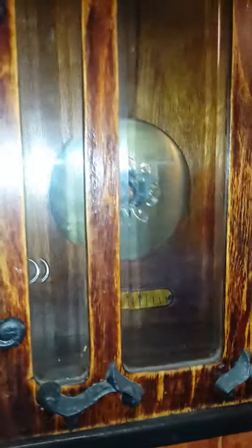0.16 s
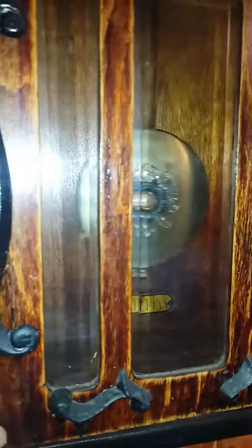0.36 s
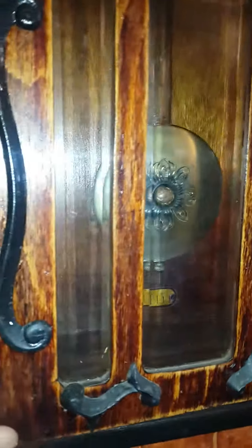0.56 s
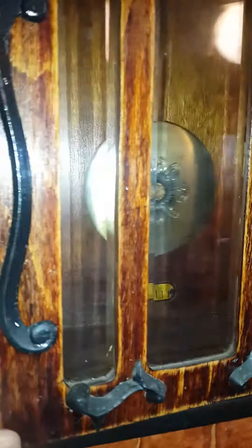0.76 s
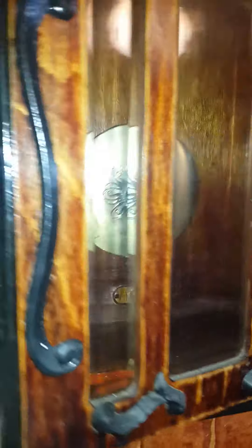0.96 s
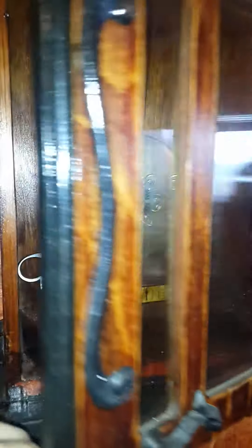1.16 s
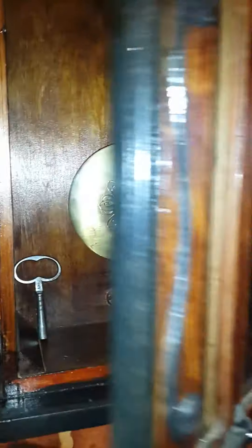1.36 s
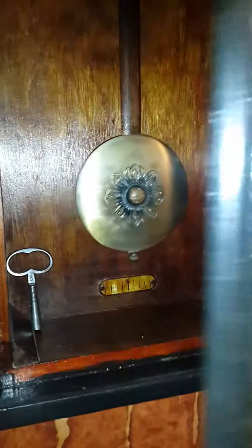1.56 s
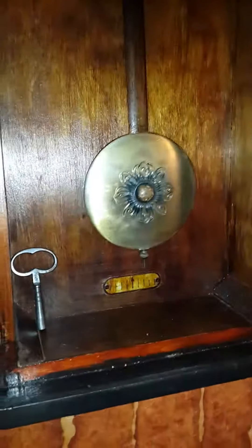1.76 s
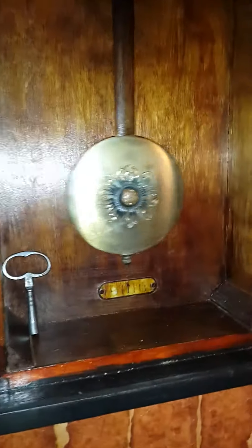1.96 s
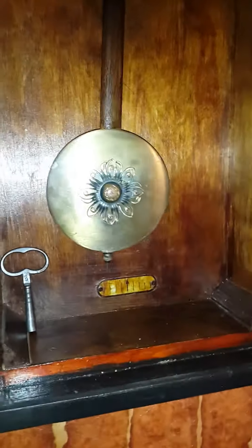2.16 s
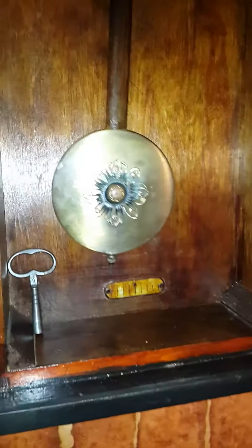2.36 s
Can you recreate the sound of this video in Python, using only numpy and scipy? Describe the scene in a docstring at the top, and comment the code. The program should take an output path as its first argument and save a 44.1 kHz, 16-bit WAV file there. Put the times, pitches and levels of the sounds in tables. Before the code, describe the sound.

A sticking wooden clock door scrapes, clicks and knocks loose at the start, ringing its hollow case; then faint hinge rubs and a soft bump, with steady metallic ticks, close stereo microphones in a quiet hissy room.

```python
"""A pendulum wall clock ticks in a quiet room; its glazed wooden door is pulled open between the beats.
The two pallets strike in turn: damped modes, a steel ping, dense clatter and a bright noise snap.
The door scrapes (shaped noise), jumps free with a knock that rings the case (modes), clicks and bumps.
Its hinge chafes as it swings. Room noise, a sinking hiss, a thin whine and faint hums lie underneath."""
import sys
import numpy as np
from scipy import signal
from scipy.fft import rfft, irfft, next_fast_len
from scipy.io import wavfile
from scipy.ndimage import map_coordinates

SR = 44100
rng = np.random.default_rng(int(sys.argv[2]) if len(sys.argv) > 2 else 0)


def wav_record(signal):
    """Record a signal, one row per channel, as 16-bit PCM in the file named by sys.argv[1]."""
    frames = np.transpose(np.atleast_2d(signal))
    bounded = np.clip(frames, -1, 1)
    # unit amplitude maps onto the largest positive 16-bit level
    quanta = np.round(bounded * 32767).astype(np.int16)
    wavfile.write(sys.argv[1], SR, quanta)


N = 105840
AGE_S = np.arange(SR) / SR  # time since a contact

# escapement beats: t/s, ring level/dB, steel ping level/dB, clatter level/dB, snap level/dB, pallet 0 or 1
BEATS = [(-.008, -53.5, -52.5, -51.5, -68, 1), (.553, -51.5, -49, -48.5, -52, 0),
         (1.141, -54, -52.5, -47, -55.5, 1), (1.698, -47, -53.5, -45, -42, 0),
         (2.290, -49.5, -49.5, -47.5, -47, 1)]
# movement modes, pallet 0: f/Hz, level/dB, t60/s
TICK_MODES = [(535.2, 1.5, 0.25), (965, -7, 0.13), (2125, -8, 0.18), (2215, 1, 0.22), (2600, 1.5, 0.14),
              (4880, -5, 0.11), (6560, -4, 0.13)]
# movement modes, pallet 1: f/Hz, level/dB, t60/s
TOCK_MODES = [(585, 0.5, 0.22), (828, -4, 0.087), (2137, -1.5, 0.27), (2210, -6.5, 0.13),
              (2602, 10.5, 0.062), (5110, 5, 0.073), (6020, 14, 0.041)]
# steel ping modes: f/Hz, level/dB, t60/s
PING_MODES = [(6340, 2.6, 0.26), (6420, 1.4, 0.14)]
# dense ring of wheels and plates: f/Hz, relative density/(dB per Hz)
CLATTER_SPECTRUM = [(150, -15), (300, -1.5), (430, -5.5), (580, 2), (720, -5.5), (1250, -8.5), (2150, 1.5),
                    (2750, -3.5), (3350, -12), (4900, -6.5), (5400, -3.5), (6500, -2.5), (8000, -21.5),
                    (15000, -21)]
# its decay: f/Hz, t60/s
CLATTER_T60 = [(300, 0.37), (2000, 0.26), (6000, 0.29), (12000, 0.39)]
# first metal contact, pallet 0: f/Hz, relative density/(dB per Hz)
TICK_SNAP = [(600, -18), (2500, -5), (3400, -22), (4850, 13.5), (5450, -2), (6600, 10), (7250, 6),
             (8200, -16), (10800, -1.5), (15500, -8)]
# first metal contact, pallet 1: f/Hz, relative density/(dB per Hz)
TOCK_SNAP = [(600, -20), (2700, 2.5), (4300, -2), (5250, 8), (7000, -3), (8500, -25), (9400, 4),
             (11000, -11), (15500, -13)]
# a tooth rubs over the pallet: t/s, length/s, level/dB
SLIDES = [(0.605, 0.013, -50), (1.062, 0.0072, -57), (1.741, 0.019, -49.5), (2.216, 0.006, -58)]
# tooth rub: f/Hz, relative density/(dB per Hz)
SLIDE_SPECTRUM = [(300, -7.5), (850, -8), (1220, 3), (1500, -3.5), (1900, 3.5), (3600, -10), (6000, -4.5),
                  (15000, -27.5)]
SNAP_T60_S, SNAP_LEFT_MINUS_RIGHT_DB, BEAT_ATTACK_S = 0.069, 5, 0.0047

# door knocks and bumps: t/s, case level/dB, door level/dB, thud level/dB, thud centre f/Hz, thud t60/s
KNOCKS = [ (.217, -32, -66, -35.5, 243, 0.26), (.255, -48.5, -49, -39.5, 435, 0.33),
          (.324, -48, -73, -48, 191, 0.32), (.503, -78, -72, -50, 195, .06),
          (.895, -71, -70, -56.5, 510, 0.29), (1.146, -92, -59.5, -86, 300, 0.099),
          (1.386, -63, -47.5, -50.5, 180, 0.42)]
# wooden case modes: f/Hz, level/dB, t60/s
CASE_MODES = [(92.8, -12.5, 0.48), (146.2, 0.5, 0.31), (175.4, -1, 0.37), (204.2, 2.5, 0.41),
              (324.7, -4.5, 0.39), (391.6, -7.5, 0.28), (470.6, -12, 0.33), (499.5, -14, 0.43),
              (606, -10, 0.21), (644, -12.5, 0.13), (717, -13, 0.21), (831, -8, 0.16), (933, -10, 0.1)]
# glazed door modes: f/Hz, level/dB, t60/s
PANEL_MODES = [(239.3, -15, 0.75), (288.7, 5.5, 0.28), (540, -7, 0.35)]
THUD_FALL_DB_PER_OCT, KNOCK_ATTACK_S = 14, 0.00066
PUSH_DB, PUSH_T60_S = 2.5, 0.034  # first swing of the wood, relative to the thud

# door edge and catch rub: t/s, length/s, level/dB
SCRAPES = [(0.176, 0.048, -48.5), (0.216, 0.048, -45), (0.256, 0.029, -43.5), (0.371, 0.0087, -56.5)]
# scrape: f/Hz, relative density/(dB per Hz)
SCRAPE_SPECTRUM = [(150, -1), (600, -13), (1200, -5), (2500, 2), (3600, -2), (5800, 4), (7500, -3),
                   (10000, -8), (15000, -14)]
# scrape decay: f/Hz, t60/s
SCRAPE_T60 = [(500, 0.65), (2000, 0.28), (6000, 0.35), (12000, 0.32)]

# the catch slips: t/s, click level/dB, click centre f/Hz, ring level/dB
CLICKS = [(0.1757, -37, 5000, -60), (0.2177, -30, 10500, -56), (.227, -42, 5400, -58),
          (0.255, -31, 4900, -49), (0.2597, -35, 5800, -47), (.3245, -44, 5900, -60)]
# metal catch modes: f/Hz, level/dB, t60/s
CATCH_MODES = [(2064, 0, 0.17), (2474, 1.5, 0.26), (3220, -6, 0.25), (5440, 6, 0.12), (5860, 1, 0.16)]
CLICK_T60_S, CLICK_LEFT_MINUS_RIGHT_DB, CLICK_FALL_DB_PER_OCT = 0.007, 0, 14

# the hinge chafes: t/s, length/s, level/dB
CHAFES = [(0.793, 0.087, -57), (1.401, 0.0086, -54.5), (1.562, 0.0095, -55)]
# chafe: f/Hz, relative density/(dB per Hz)
CHAFE_SPECTRUM = [(400, -15.5), (2400, -8.5), (4000, -8.5), (4450, -8), (5050, -3.5), (6500, 3.5),
                  (8700, -10), (15000, -18)]
# chafe decay: f/Hz, t60/s
CHAFE_T60 = [(500, 0.62), (10000, 0.14)]
# hinge mode: f/Hz, level/dB, t60/s
HINGE_MODES = [(4480, -1, 0.11)]
CHAFE_RISE = 0.74  # swell time constant / chafe length

# room noise: f/Hz, relative density/(dB per Hz)
ROOM_SPECTRUM = [(30, -59), (48, 18), (70, -41), (105, -6.5), (170, -11), (270, -16), (450, -20),
                 (4500, -31.5), (15000, -26.5)]
# hiss level: t/s, level/dB
HISS_LEVEL = [(0, -60), (.6, -62.5), (1.05, -64), (1.33, -65), (1.5, -63), (1.9, -66.5), (2.4, -73.5)]
# hiss: f/Hz, relative density/(dB per Hz)
HISS_SPECTRUM = [(100, 4.5), (195, 14.5), (280, 9.5), (450, 10.5), (1000, -3), (2200, 3), (3600, -0.5),
                 (6000, 3), (8500, -6), (15000, -9)]
# thin whine, narrow-band noise: f/Hz, relative density/(dB per Hz)
WHINE_SPECTRUM = [(5400, -32), (5720, -4), (5800, -4), (5950, -17), (6400, -65)]
# wavering tones: f/Hz, level/dB
HUM_TONES = [(97.5, -72.5), (129, -75.5), (148, -75.5), (195, -71.5), (5735, -81), (5783, -81.5)]
# lowest hum: t/s, level/dB
LOW_HUM_LEVEL = [(0, -73), (.7, -61.5), (1.2, -83), (1.6, -61), (1.95, -63), (2.4, -60)]
ROOM_DB, WHINE_DB, LOW_HUM_HZ = -66, -82.5, 51.8

# left-right likeness: f/Hz, correlation/1
ALIKE = [(100, 1), (300, 0.83), (650, 0.43), (1500, 0), (15000, 0)]
# microphone balance: f/Hz, left minus right/dB
BALANCE = [(100, 3), (300, 0.5), (600, 2), (1800, -3.5), (3200, 0.5), (6000, 1), (11000, 3)]
LOW_CUT_HZ, TOP_HZ = 57.3, 15600
# narrow resonances in noise: depths, knot spacing, frequency at which the depth is halved
BURST_RIPPLE_DB, HISS_RIPPLE_DB, RIPPLE_HZ, RIPPLE_TOP_HZ = 5, 4, 39.73, 5150


def escapement():
    """Teeth snap onto alternate pallets and ring the movement; between beats a tooth rubs over a pallet."""
    out = np.zeros((2, N))
    for s, ring_db, ping_db, clatter_db, snap_db, pallet in BEATS:
        modes, snap = (TOCK_MODES, TOCK_SNAP) if round(pallet) else (TICK_MODES, TICK_SNAP)
        add(out, s, amp(ring_db) * ring(modes, BEAT_ATTACK_S, blur=0.28, blur_rate=153))
        add(out, s, amp(ping_db) * ring(PING_MODES, BEAT_ATTACK_S, blur=0.43, blur_rate=83))
        add(out, s, amp(clatter_db) * burst(CLATTER_SPECTRUM, CLATTER_T60, BEAT_ATTACK_S))
        add(out, s, amp(snap_db) * crack(snap, SNAP_T60_S, SNAP_LEFT_MINUS_RIGHT_DB))
    for s, length_s, db in SLIDES:
        add(out, s, amp(db) * burst(SLIDE_SPECTRUM, CLATTER_T60, attack_s=0.014, hold_s=length_s))
    return out


def door_knocks():
    """Each knock pushes the wood (damped sine under a noise thud) and rings case and door."""
    out = np.zeros((2, N))
    for s, case_db, panel_db, thud_db, centre_hz, t60_s in KNOCKS:
        rise = 1 - np.exp(-AGE_S / KNOCK_ATTACK_S)
        thud = noise(hump(centre_hz, THUD_FALL_DB_PER_OCT), SR) * amp(-60 * AGE_S / t60_s) * rise
        push = amp(PUSH_DB - 60 * AGE_S / PUSH_T60_S) * np.sin(2 * np.pi * centre_hz * AGE_S)
        add(out, s, amp(thud_db) * (thud - push))
        add(out, s, amp(case_db) * ring(CASE_MODES, attack_s=0.002, blur=0.3, blur_rate=25))
        add(out, s, amp(panel_db) * ring(PANEL_MODES, attack_s=0.018, blur=0.27, blur_rate=69))
    return out


def door_scrapes():
    """The sticking edge rubs with uneven grip, exciting many close modes."""
    out = np.zeros((2, N))
    for s, length_s, db in SCRAPES:
        grip = amp(2.4 * wobble(400, SR))
        rub = burst(SCRAPE_SPECTRUM, SCRAPE_T60, attack_s=0.0029, hold_s=length_s)
        add(out, s, amp(db) * grip * rub)
    return out


def catch_clicks():
    """The slipping catch gives a short noise click and rings in its metal modes."""
    out = np.zeros((2, N))
    for s, click_db, centre_hz, ring_db in CLICKS:
        spectrum = hump(centre_hz, CLICK_FALL_DB_PER_OCT)
        add(out, s, amp(click_db) * crack(spectrum, CLICK_T60_S, CLICK_LEFT_MINUS_RIGHT_DB))
        add(out, s, amp(ring_db) * ring(CATCH_MODES, attack_s=0.0045, blur=0.64, blur_rate=179))
    return out


def hinge_chafes():
    """Friction in the hinge swells as shaped noise and sounds one blurred mode."""
    out = np.zeros((2, N))
    for s, length_s, db in CHAFES:
        rise_s = CHAFE_RISE * length_s
        add(out, s, amp(db) * burst(CHAFE_SPECTRUM, CHAFE_T60, attack_s=rise_s, hold_s=length_s))
        add(out, s, amp(db) * ring(HINGE_MODES, attack_s=rise_s, blur=0.47, blur_rate=300))
    return out


def hiss():
    """Noise with narrow resonances; its level follows a curve that ends low."""
    level_db = np.interp(np.arange(N) / SR, *np.transpose(HISS_LEVEL))
    return amp(level_db) * resonant(noise(HISS_SPECTRUM, N), HISS_RIPPLE_DB)


def hum():
    """A low sine of changing level, plus tones that waver in level and phase."""
    t = np.arange(N) / SR
    level_db = np.interp(t, *np.transpose(LOW_HUM_LEVEL))
    out = amp(level_db) * np.sin(2 * np.pi * LOW_HUM_HZ * t)
    for hz, db in HUM_TONES:
        tone = amp(1.5 * wobble(6, N)) * np.sin(2 * np.pi * hz * t + .7 * wobble(7, N))
        out += amp(db) * unit(tone)
    return out


def whine():
    """Steady narrow-band noise, heard as a thin whine."""
    return amp(WHINE_DB) * noise(WHINE_SPECTRUM, N)


def room():
    """Steady coloured noise of the room."""
    return amp(ROOM_DB) * noise(ROOM_SPECTRUM, N)


def ring(modes, attack_s, blur, blur_rate):
    """Damped modes, alternating sign, wandering phase; high ones are out of step between microphones."""
    out = np.zeros((2, SR))
    for k, (hz, db, t60_s) in enumerate(modes):
        apart = half_angle(hz) * rng.choice([-1, 1])
        drift = blur * np.sqrt(hz / 1e3) * np.array([wobble(blur_rate, SR), wobble(blur_rate, SR)])
        phase = 2 * np.pi * hz * AGE_S + drift + [[apart], [-apart]]
        out += (-1) ** k * amp(db - 60 * AGE_S / t60_s) * np.sin(phase)
    return out * (1 - np.exp(-AGE_S / attack_s))


def burst(spectrum, t60, attack_s, hold_s=0):
    """Many close modes, as rippled noise: rise, hold, then decay at each band's own rate."""
    hz, t, bands = signal.stft(resonant(noise(spectrum, SR), BURST_RIPPLE_DB), SR, nperseg=128)
    fade = amp(-60 * np.maximum(t - hold_s, 0) / along(t60, hz)[:, None])
    faded = signal.istft(bands * fade, SR, nperseg=128)[1][:, :SR]
    return faded * (1 - np.exp(-AGE_S / attack_s))


def crack(spectrum, t60_s, left_minus_right_db):
    """Brief metal contact: decaying noise with a level offset between channels."""
    pan = amp([[left_minus_right_db / 2], [-left_minus_right_db / 2]])
    return noise(spectrum, SR) * amp(-60 * AGE_S / t60_s) * pan


def noise(spectrum, size):
    """Coloured stereo noise of rms 1, alike in the bass, unrelated in the treble."""
    hz = np.fft.rfftfreq(size, 1 / SR)
    turn = half_angle(hz)
    phases = np.exp(2j * np.pi * rng.random((2, len(hz))))
    mid, side = irfft(phases * amp(along(spectrum, hz)) * [np.cos(turn), np.sin(turn)], size)
    return unit(np.array([mid + side, mid - side]))


def resonant(x, depth_db):
    """Narrow peaks and dips at chance frequencies, shallower in the treble; rms 1."""
    spread, size = rfft(x), x.shape[1]
    depth = depth_db / (1 + (np.fft.rfftfreq(size, 1 / SR) / RIPPLE_TOP_HZ) ** 2)
    ripple = wobble(SR * SR / size / RIPPLE_HZ, spread.shape[1])  # one knot per RIPPLE_HZ
    return unit(irfft(spread * amp(depth * ripple), size))


def hump(centre_hz, fall_db):
    """Spectrum falling by fall_db per octave either side of its centre."""
    return [(centre_hz * 2. ** k, -fall_db * abs(k)) for k in range(-6, 7)]


def half_angle(hz):
    """Half the left-right phase angle whose cosine is the likeness."""
    return np.arccos(np.clip(along(ALIKE, hz), -1, 1)) / 2


def wobble(rate, size):
    """Smooth random curve, rate knots per SR samples."""
    return map_coordinates(rng.standard_normal(4096), [np.arange(size) * rate / SR], mode="wrap")


def along(points, hz):
    """Read (Hz, value) points on a log frequency axis."""
    f, v = np.transpose(points)
    return np.interp(np.log(hz + 1), np.log(f + 1), v)


def add(track, s, sound):
    """Mix a sound into the track at s seconds, cutting what falls outside."""
    start = round(s * SR)
    part = sound[..., max(-start, 0):N - start]
    track[:, max(start, 0):][:, :part.shape[-1]] += part


def amp(db):
    """Decibels to gain."""
    return 10 ** (np.asarray(db) / 20)


def unit(x):
    """Scale to rms 1."""
    return x / np.sqrt(np.mean(x ** 2) + 1e-20)


def scene():
    """Clock, door and background."""
    door = door_knocks() + door_scrapes() + catch_clicks() + hinge_chafes()
    background = hiss() + hum() + whine() + room()
    return escapement() + door + background


def record(dry):
    """Two microphones differ slightly in colour; a low cut and a top limit bound their band."""
    size = next_fast_len(N + SR // 2)
    hz = np.fft.rfftfreq(size, 1 / SR)
    colour = amp(along(BALANCE, hz) * np.array([[.5], [-.5]]))
    low_cut = 1 - 1 / (1 + (hz / LOW_CUT_HZ) ** 8)
    return irfft(rfft(dry, size) * colour * low_cut * (hz < TOP_HZ), size)[:, :N]


dry = scene()
out = record(dry)
wav_record(out)
```